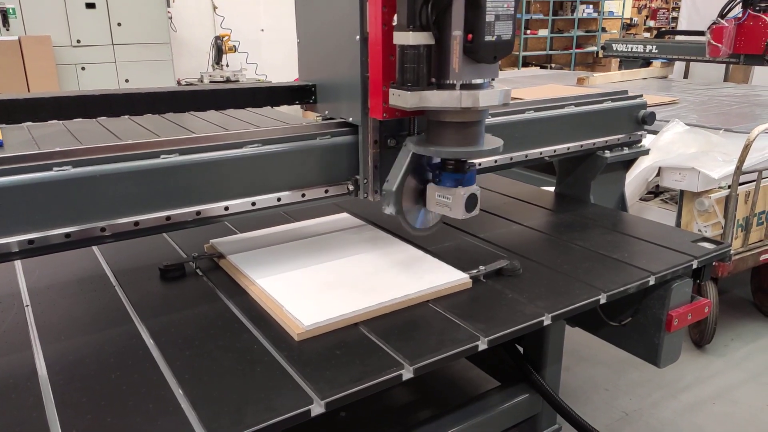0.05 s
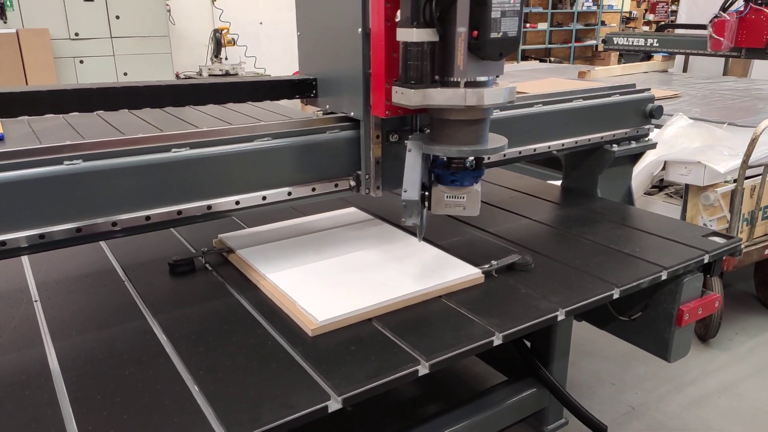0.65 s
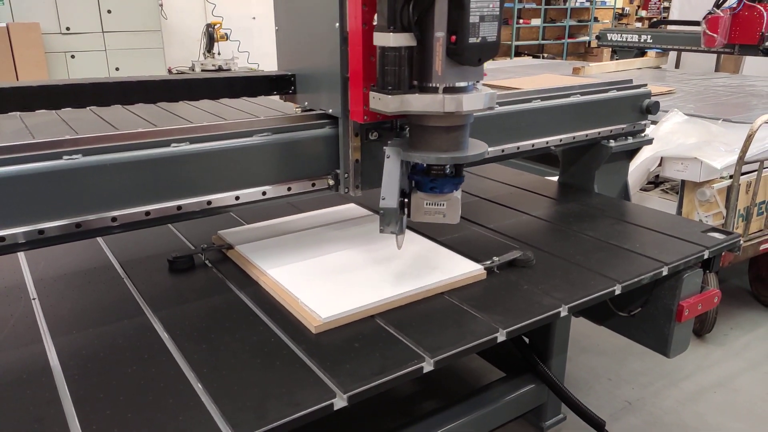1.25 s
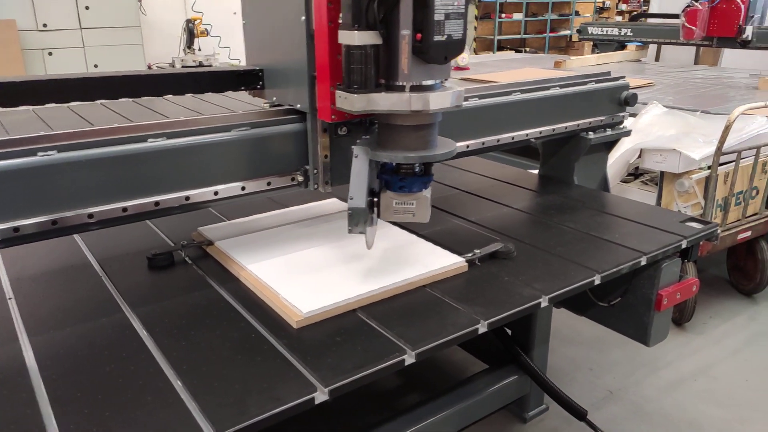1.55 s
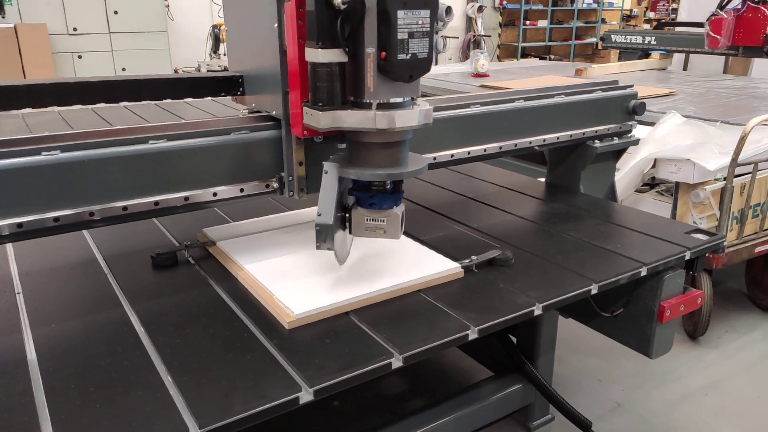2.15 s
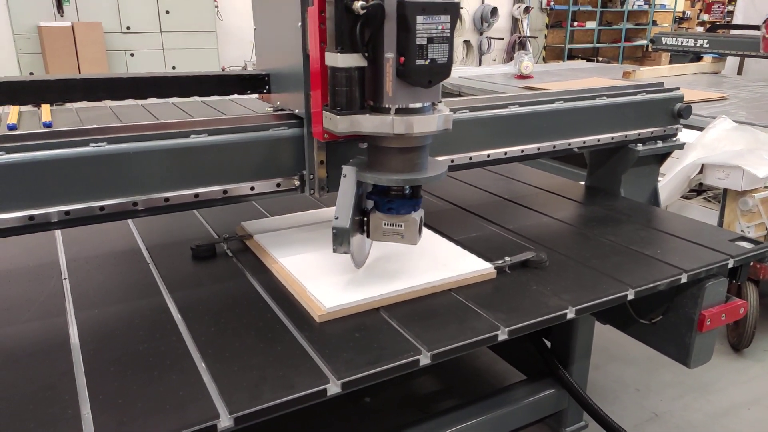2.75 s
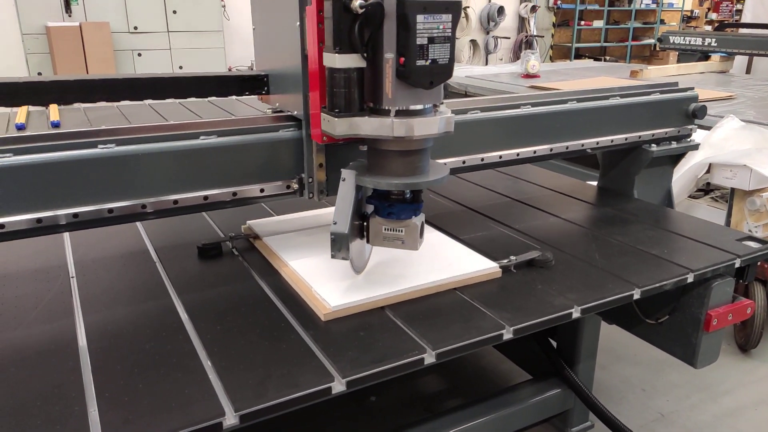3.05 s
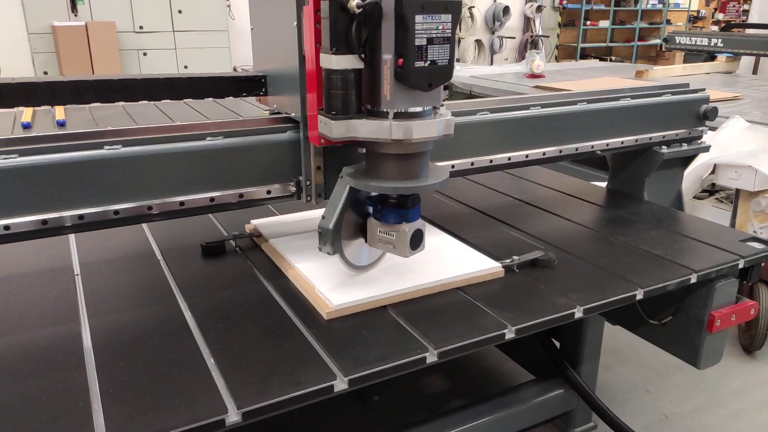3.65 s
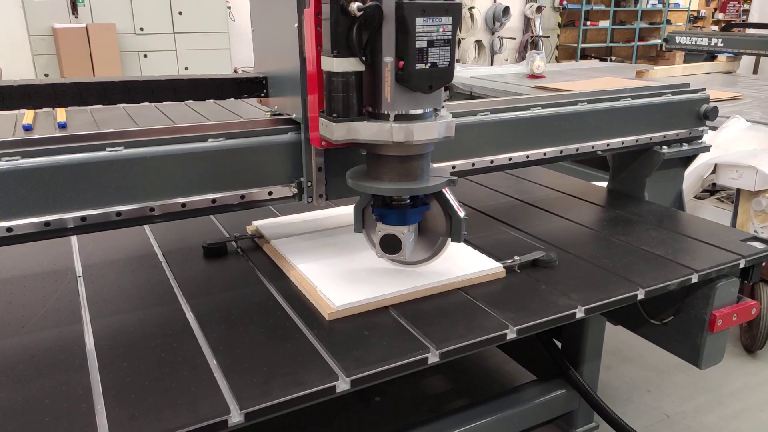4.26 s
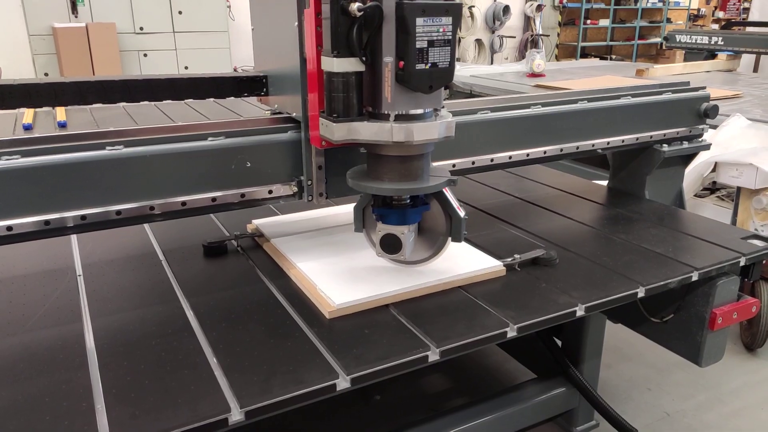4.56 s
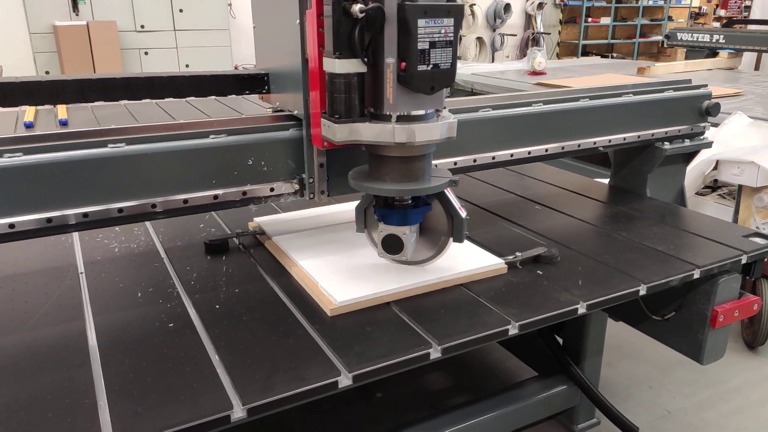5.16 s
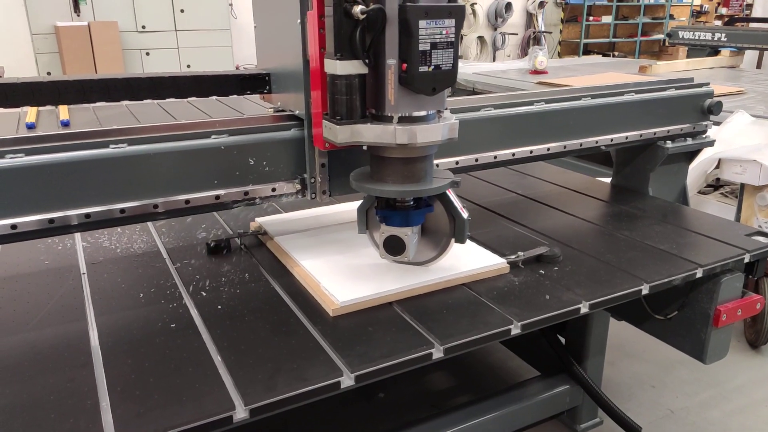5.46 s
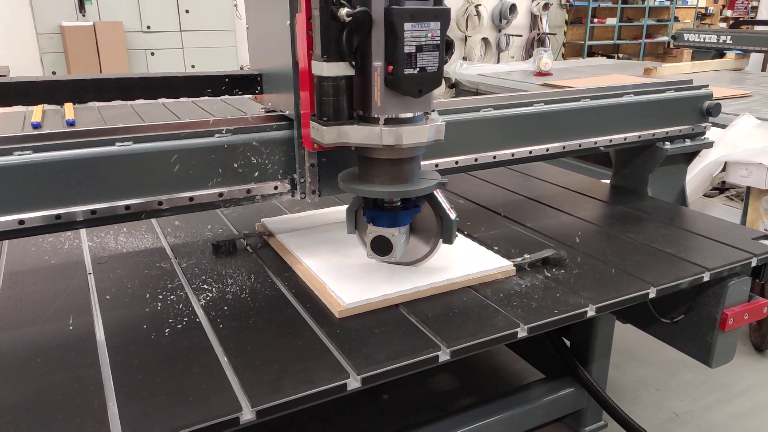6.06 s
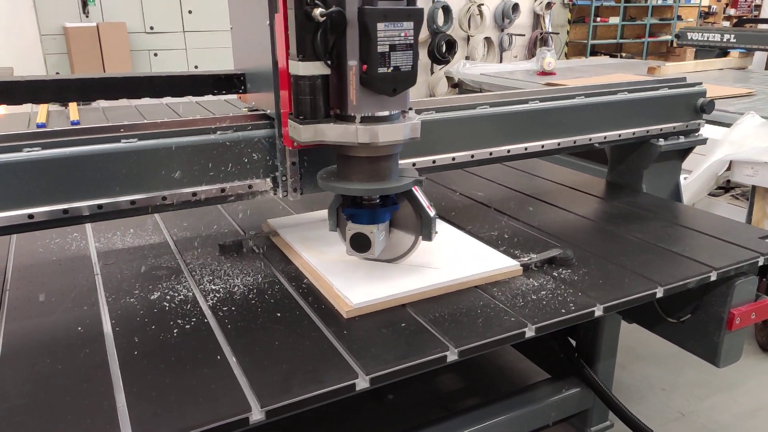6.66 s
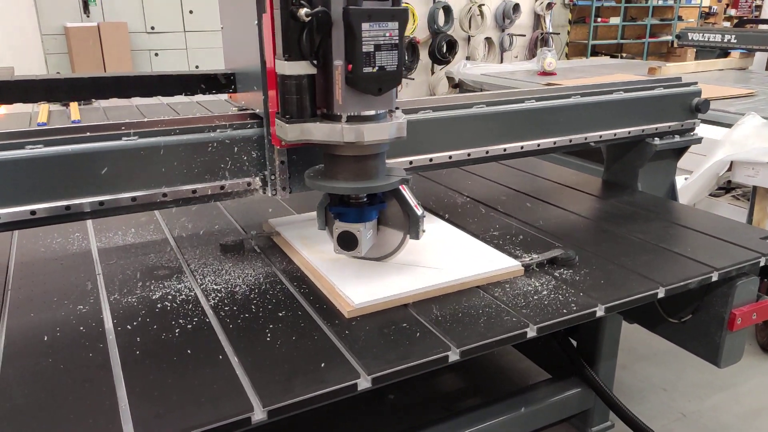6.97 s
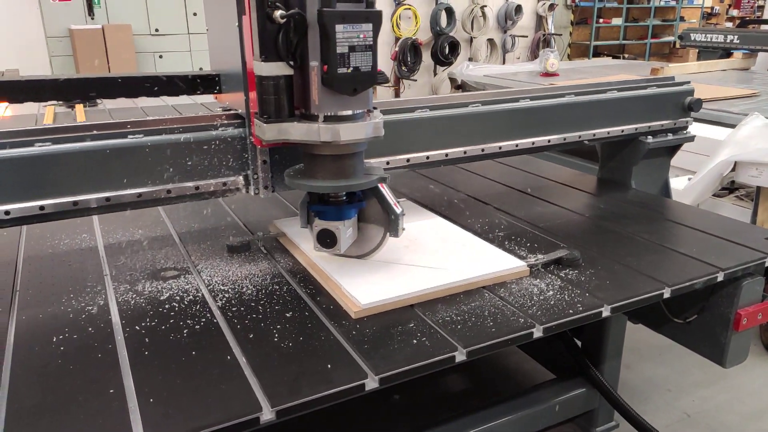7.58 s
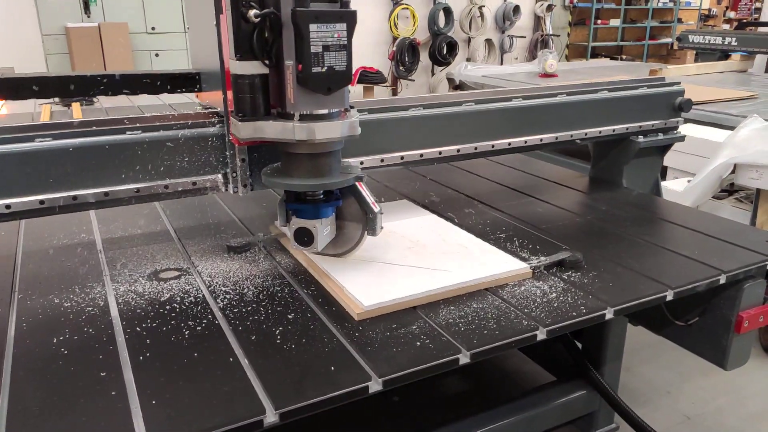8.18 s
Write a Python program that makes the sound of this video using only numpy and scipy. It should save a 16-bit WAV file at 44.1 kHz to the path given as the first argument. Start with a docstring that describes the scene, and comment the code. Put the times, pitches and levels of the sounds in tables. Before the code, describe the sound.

A brief servo whine ends in a chirp over the steady airy whir of a circular saw on a CNC router. Soft motor tones come and go above a low workshop rumble. Then the disc plunges into a plastic sheet with loud metallic ringing and screeching, centred and direct. As it feeds on, the ringing fades, leaving a wide, steady rasp with hissing chips, a gear drone sinking slightly in pitch and a high whistle.

```python
"""A servo whine brakes to a chirp over rushing air, gear whine and whistling drives: a CNC router swivels
its spinning 40-tooth saw in a workshop, rolls nearer and swivels back. The disc plunges into a clamped
plastic sheet; the teeth make it ring, chatter and squeal. In the feed the kerf damps the disc,
the spindle sags, the loaded gears buzz and the cut settles into a hissing rasp."""
import sys
import numpy as np
from scipy import signal
from scipy.fft import rfft, irfft
from scipy.io import wavfile

SR = 44100
rng = np.random.default_rng(int(sys.argv[2]) if len(sys.argv) > 2 else 0)


def unload_wav(signal):
    """Save mono or channel-first audio to the path in sys.argv[1] as 16-bit WAV at rate SR, clipped to [-1, 1]."""
    wavfile.write(
        sys.argv[1],
        SR,
        np.round(np.clip(np.atleast_2d(signal).T, -1, 1) * 32767).astype(np.int16),
    )


N = 366912
TIME = np.arange(N) / SR
FREQ = np.maximum(np.arange(N // 2 + 1) * SR / N, 1)

TEETH = 40
BRAKE_S, ARRIVE_S, TURN_S = .15, 2.85, 3.9  # head brakes edge-on, ends its approach, turns side-on
CONTACT_S, BOTTOM_S, FEED_S = 4.48, 5.95, 6.02  # disc touches, reaches full depth, starts to feed
SETTLING_S = (6.45, 6.9)  # spindle stops labouring


def undb(db):
    """Decibels to gain."""
    return 10 ** (np.asarray(db) / 20)


def fade(start_s, end_s):
    """Linear ramp from 0 to 1."""
    return np.clip((TIME - start_s) / (end_s - start_s), 0, 1)


def swell(centre_s, length_s):
    """Bell with peak 1, above one half for length_s."""
    return .5 ** ((2 * (TIME - centre_s) / length_s) ** 2)


def noise():
    """Independent white noise for mid and side."""
    return rng.standard_normal((2, N))


def walk(rate_hz):
    """Smooth random wander of spread 1, mid and side."""
    wander = irfft(rfft(noise()) / (1 + (FREQ / rate_hz) ** 4), N)
    return wander / wander.std()


def phase(hz):
    """Running angle in radians of a steady or varying frequency."""
    return 2 * np.pi * np.cumsum(hz * np.ones(N)) / SR


def shape(points):
    """Gain over frequency from (Hz, dB) points."""
    hz, db = np.transpose(points)
    return undb(np.interp(np.log(FREQ), np.log(hz), db))


def peaks(modes):
    """Response of (Hz, width in Hz, power in dB) resonances."""
    return sum(undb(db) / np.sqrt(width) / (1 + 1j * (FREQ ** 2 - hz ** 2) / (FREQ * width * 1.34)) ** 2
               for hz, width, db in modes)


def dense_modes(spacing_hz, depth_db):
    """Ragged response of a steel disc's many high modes."""
    hz = np.arange(0, SR / 2, spacing_hz)
    return undb(depth_db * np.interp(FREQ, hz, rng.standard_normal(len(hz))))


def ring(force, response, band_hz=(20, 20000)):
    """Force through a response, scaled to rms 1 inside the band."""
    spectrum = rfft(force) * response
    inside = spectrum[0, (FREQ > band_hz[0]) & (FREQ < band_hz[1])]
    return irfft(spectrum, N) * N / np.sqrt(2 * np.sum(np.abs(inside) ** 2))


def tones(lines, base_hz=1, waver_db=2, waver_hz=9, blur_rad=.16):
    """Wavering sines from (multiple of base, dB) rows; mid and side in quadrature."""
    waver, out = walk(waver_hz), 0
    for multiple, db in lines:
        level_drift, phase_drift = np.roll(waver, rng.integers(N), axis=1)
        angle = multiple * phase(base_hz) + 2 * np.pi * rng.random() + blur_rad * phase_drift
        out = out + undb(db + waver_db * level_drift) * np.array([np.sin(angle), np.cos(angle)])
    return np.sqrt(2) * out


def glides(rows, edge_s, waver_db=2, waver_hz=8):
    """Tones that swell, slide in pitch and fade."""
    waver, out = walk(waver_hz), 0
    for start_s, end_s, first_hz, last_hz, db in rows:
        level_drift, phase_drift = np.roll(waver, rng.integers(N), axis=1)
        angle = phase(np.interp(TIME, [start_s, end_s], [first_hz, last_hz])) + .31 * phase_drift
        ramp_s = min(edge_s, (end_s - start_s) / 4)
        gate = fade(start_s, start_s + ramp_s) * (1 - fade(end_s - ramp_s, end_s))
        out = out + gate * undb(db + waver_db * level_drift) * np.array([np.sin(angle), np.cos(angle)])
    return np.sqrt(2) * out


def workshop_echo(sound, t60_s, wet_db):
    """Sound plus its dying wall reflections."""
    tail = noise()[:, :SR] * undb(-60 * TIME[:SR] / t60_s)
    tail = tail / np.sqrt(np.sum(tail[0] ** 2))
    wet = undb(wet_db)
    return (sound + wet * signal.fftconvolve(sound, tail, axes=1)[:, :N]) / np.hypot(1, wet)


def stereo(sound, side_db, direct_share, swings_per_octave=2.6):
    """Reflections swing the phase between left and right; the diffuse field adds unrelated sound."""
    # Each row: frequency in Hz, relative side level in dB.
    width = [(40, -24), (110, -21.5), (200, -16), (370, -10.5), (680, -7.5), (1240, -2.5), (2270, -1),
             (4160, -.5), (7630, -.3), (14000, 0)]
    mid, diffuse = rfft(sound)
    swing = np.tanh(4 * np.sin(2 * np.pi * np.log2(FREQ / 1000) * swings_per_octave))
    side = np.sqrt(direct_share) * 1j * swing * mid + np.sqrt(1 - direct_share) * diffuse
    side = side * shape(width) * undb(side_db)
    return irfft(np.array([mid + side, mid - side]), N)


def workshop_rumble():
    """Steady low room noise."""
    # Each row: frequency in Hz, relative level in dB.
    spectrum = [(15, -32), (28, -25), (60, -21), (100, -12), (160, -12), (210, -2), (270, 0), (340, -2.5),
                (500, -40), (1000, -29), (3000, -80)]
    return ring(noise(), shape(spectrum)) * undb(-49.5)


def spindle():
    """Turns per second: the plunge slows the shaft a little, the feed drags it lower."""
    # Each row: time in seconds, shaft speed in Hz.
    speed = [(4.48, 116.3), (5.9, 115), (6.05, 113.9), (6.2, 112.8), (6.45, 111.7), (6.6, 110.3),
             (6.85, 108.4), (7.1, 108.1), (7.55, 107.05), (8.3, 106.85)]
    return np.interp(TIME, *np.transpose(speed))


def free_running(shaft_hz):
    """The disc stirs air through its guard; the gears whine and ring their housing."""
    # Air rush and tooth hiss. Each row: frequency in Hz, relative level in dB.
    rush_spectrum = [(180, -36), (300, -13), (455, -0.5), (588, -5), (669, -4.5), (824, -9.5), (943, -3),
                     (1340, -17.5), (1500, -12), (1950, -10), (3300, -120)]
    hiss_spectrum = [(700, -14), (1200, -3), (1400, -11.5), (1950, -5), (2500, -6.5), (3150, -10.5),
                     (3500, -8.5), (4000, -12), (4800, -9), (5400, -15.5), (6200, -12), (6750, -15.5),
                     (7300, -17), (8700, -28), (10300, -33), (11500, -59), (14300, -80)]
    # Air resonances. Each row: frequency in Hz, width in Hz, relative power in dB.
    guard_modes = [(462.4, 58, 1), (962, 24, -7.5), (1101, 35, -1.5), (5960, 200, -18)]
    # Each row: multiple of shaft speed, level in dB.
    gear_lines = [(7.5, -49), (15, -51.5), (30, -60.5)]
    far = 1 - fade(BRAKE_S, ARRIVE_S)
    turn_db = 2.5 * swell(TURN_S, .27)
    side_on = fade(TURN_S, 4.14)
    rush = ring(noise(), shape(rush_spectrum), (250, 700))
    hiss = ring(noise(), shape(hiss_spectrum) * dense_modes(spacing_hz=90, depth_db=1.3), (3000, 8000))
    hiss *= undb(-45 + turn_db)
    guard = ring(noise(), peaks(guard_modes))
    air = (rush * undb(-2) + guard * undb(-6.5)) * undb(-38 - 6 * far)
    housing = ring(noise(), peaks([(1754, 45, 0), (1805, 58, -2)]))
    housing *= undb(-47 + 9 * side_on + turn_db) * (1 - fade(5.0, 6.3))
    edge_whistle = ring(noise(), peaks([(6156, 110, 0)])) * undb(-53) * fade(.34, 1.2) * (1 - side_on)
    whine = tones(gear_lines, shaft_hz, waver_db=1.5) * (1 - fade(FEED_S, SETTLING_S[0]))
    return air + hiss + housing + edge_whistle + whine


def swivel():
    """The braking swivel's whine drops to a faint chirp; its casing rings on."""
    # Each row: frequency at full speed in Hz, relative level in dB.
    lines = [(888, -46.5), (1782, -41), (1887, -42.5), (3774, -40.5), (5658, -50), (7530, -58), (9430, -62)]
    speed = 1 - fade(BRAKE_S, BRAKE_S + .15) ** 1.5
    gain = speed * undb(.5 - 9 * fade(BRAKE_S, BRAKE_S + .02))
    whine = tones(lines, speed, waver_db=2.5, waver_hz=70, blur_rad=.5) * gain
    casing_db = -41.5 - 54 * np.maximum(TIME - BRAKE_S, 0)
    casing = ring(noise(), peaks([(1920, 290, 0)])) * undb(casing_db)
    return workshop_echo(whine, t60_s=.56, wet_db=-8.5) + casing


def servos():
    """The drives' switching whistles throughout; the servos sing as they move the head."""
    # Each row: frequency in Hz, level in dB.
    drive_lines = [(7833, -67), (8000, -64), (8166, -73), (10826, -77)]
    # Each row: start and end in seconds, first and last pitch in Hz, level in dB.
    moves = [ (-.2, .38, 8000, 8000, -53), (-.2, 2.65, 11752, 11752, -63.5), (-.2, 1.2, 11752, 11752, -62),
             (-.2, 2.55, 12252, 12252, -68), (2.05, 2.7, 1385, 1475, -54), (2.2, 3.75, 618, 672, -50),
             (2.8, 3.45, 531, 534, -44), (3.06, 3.28, 90, 82, -58), (3.4, 4.6, 11752, 11752, -63),
             (3.62, 5.3, 668, 688, -47), (3.755, 3.805, 4400, 4750, -46), (.205, .255, 2650, 2050, -46),
             (3.74, 3.86, 1790, 1810, -38), (6.65, 8.5, 8000, 8000, -46.5), ]
    turn_whine = ring(noise(), peaks([(8000, 35, 0)])) * undb(-46.5)
    turn_whine *= fade(3.55, 3.95) * (1 - fade(4.02, 4.08))
    return turn_whine + tones(drive_lines, waver_hz=3) + glides(moves, edge_s=.14)


def gear_buzz(shaft_hz):
    """Loaded gears, meshing alike every fourth turn, drone; their tones sink through board resonances."""
    # Each row: multiple of shaft speed, relative level in dB while labouring, and once settled.
    gear_lines = [ (5.25, -52, -48), (5.5, -50, -46), (6, -49, -55), (6.25, -49, -53), (6.5, -55, -45),
                  (7.5, -49.5, -51), (7.75, -58, -56), (8, -55, -52), (9, -46, -56), (9.25, -47, -51),
                  (9.5, -45, -53), (9.75, -47, -46), (10, -40, -47), (11, -48, -52), (11.25, -56, -49),
                  (12.5, -60, -52), (15, -42, -43), (16, -53, -51), (17, -45, -54), (18, -51, -45),
                  (18.25, -55, -50), (19, -51, -47), (20, -43, -46), (21, -56, -47), (22, -54, -50), ]
    # Each row: frequency in Hz, width in Hz, boost in dB.
    board_modes = [(667, 14, 7), (847, 32, 12), (1010, 18, 11), (1055, 24, 8), (1237, 22, 7), (2141, 12, 7),
                   (2234, 36, 10)]
    settled = fade(*SETTLING_S)
    axis_hz = FREQ[::4]
    lift_db = sum(db * .5 ** ((2 * (axis_hz - hz) / width) ** 2) for hz, width, db in board_modes)
    lines = []
    for multiple, labour_db, settled_db in gear_lines:
        load_db = labour_db + (settled_db - labour_db) * settled
        lines.append((multiple, load_db + np.interp(multiple * shaft_hz, axis_hz, lift_db)))
    drone = tones(lines, shaft_hz, waver_db=2.2, waver_hz=5, blur_rad=.22)
    return drone * fade(FEED_S, FEED_S + .1) * undb(1)


def bites(shaft_hz, tooth_depth=.83, turn_depth=.072, grain_db=.5):
    """Crackling cutting force: each tooth tears a chip, and the disc bites harder once a turn."""
    turn = phase(shaft_hz)
    pressure = (1 + tooth_depth * np.cos(TEETH * turn)) * (1 + turn_depth * np.cos(turn))
    return noise() * pressure * undb(grain_db * walk(1600)[0])


def cut_db(touch_db, deep_db, fall_db_per_s):
    """Relative level that climbs as the disc sinks in and falls as the kerf lengthens."""
    climb_db = (deep_db - touch_db) * fade(CONTACT_S, BOTTOM_S)
    return touch_db + climb_db - fall_db_per_s * np.maximum(TIME - BOTTOM_S, 0)


def chips(shaft_hz):
    """Swarf hisses off the teeth in uneven spurts, thinning while the head rests at full depth."""
    # Each row: frequency in Hz, relative level in dB.
    spectrum = [(1500, -33), (2400, -6), (2630, -9), (2850, 5.5), (2990, 4.5), (3110, -13), (3230, 2),
                (3340, -1), (3510, -16), (3680, 7.5), (4050, -3), (4180, -1), (4310, -0.5), (4500, -0.5),
                (4750, -5.5), (5120, 1.5), (5350, -1), (5550, -1.5), (6100, 3), (6600, 2.5), (7450, 4.5),
                (7880, -3.5), (8200, 1), (8700, -1), (9500, -15), (10100, -3), (11000, -12), (11800, -7),
                (13000, -10.5), (14000, -6.5)]
    # Each row: centre and length in seconds, boost in dB.
    spurts = [(6.163, 0.077, 3.5), (7.413, 0.09, 2.5)]
    response = shape(spectrum) * dense_modes(spacing_hz=40, depth_db=3.3)
    hiss = ring(bites(shaft_hz, turn_depth=.1, grain_db=1.8), response, (5000, 9000))
    spurts_db = sum(db * swell(s, length_s) for s, length_s, db in spurts) + .91 * walk(32)[0]
    rest_db = -5 * swell(FEED_S, .15)
    return hiss * undb(cut_db(-34.5, -27.5, fall_db_per_s=.91) + spurts_db + rest_db - 4.5)


def sheet(shaft_hz):
    """The teeth make the sheet roar; in the feed the kerf and the clamped board resonate."""
    # Each row: frequency in Hz, relative level in dB.
    spectrum = [(88, -56), (150, -25), (199, -15.5), (302, -15.5), (357, -9), (576, -0.5), (765, -7.5),
                (838, -1.5), (917, -47), (1040, 2.5), (1140, -7), (1800, -3.5), (2180, 1), (2580, -8.5),
                (3300, -39), (4290, -47), (7260, -120)]
    # Each row: frequency in Hz, width in Hz, relative power in dB.
    kerf_modes = [(2237, 45, 0), (2510, 60, -6), (2840, 110, -4), (3750, 210, -5), (3920, 35, 2),
                  (4270, 30, -2.5), (4970, 64, 2.5), (5930, 36, 0.5), (6330, 25, 6.5), (6490, 46, 8.5),
                  (7250, 29, 2.5), (7820, 45, -3), (8790, 40, -6), (8840, 35, -11)]
    labour_db = 2 * swell(FEED_S, .6)
    gain = undb(cut_db(-33.5, -30, fall_db_per_s=1.2) + labour_db)
    feeding = fade(BOTTOM_S, FEED_S + .32)
    roar = ring(bites(shaft_hz, turn_depth=.12), shape(spectrum), (750, 1400))
    roar *= undb(-6) * (.46 + .36 * fade(5.02, 5.06))
    kerf = ring(bites(shaft_hz), peaks(kerf_modes)) * undb(-.5) * feeding
    board = ring(bites(shaft_hz), peaks([(1052, 63, 0)])) * feeding * (1 - fade(6.8, 7.5))
    return (roar + kerf) * gain + board * undb(-40.5)


def disc_ring(shaft_hz, low_width_hz=11, high_width_hz=24):
    """The barely held disc rings and shakes the sheet until the kerf damps it."""
    # Disc modes. Each row: frequency in Hz, relative power in dB.
    low_modes = [(2209, 2), (2326, -4), (2482, -7), (2541, -10), (2794, -6), (2966, -9)]
    high_modes = [(3935, 6), (4624, 0), (4910, -2.5), (5938, -3.5), (6180, -6), (6300, -0.5), (6476, -5.5),
                  (6820, -6), (7154, 1.5), (7630, -1), (8775, -3.5)]
    # Sheet resonances. Each row: frequency in Hz, width in Hz, relative power in dB.
    chatter_modes = [(1107, 38, -10), (1660, 71, -4.5), (1780, 58, 1), (1833, 110, -2.5), (2190, 91, -0.5),
                     (2467, 100, -6), (3743, 240, -3), (5180, 580, -5.5), (6940, 1100, -6.5)]
    # Dips between the ringing ranges. Each row: frequency in Hz, gain in dB.
    gaps = [(2560, 0), (2660, -4), (2780, 0), (3000, 0), (3120, -10), (3240, -3), (3400, -9), (3600, 0),
            (4050, 0), (4150, -5), (4300, 0), (4420, -5), (4600, 0)]
    # The sheet grabs the disc. Each row: centre and length in seconds, low, chatter, high boost in dB.
    grabs = [ (5.33, 0.21, 4.5, 3, 0.5), (5.628, 0.14, 3, 8.5, 6.5), (5.796, 0.073, 0, 3.5, 5),
             (5.872, 0.097, -1, 9.5, 3), (5.958, 0.027, -12, 6.5, -4), ]
    low_db, chatter_db, high_db = sum(np.outer(dbs, swell(s, length_s)) for s, length_s, *dbs in grabs)
    force = bites(shaft_hz, grain_db=1.5)
    low = ring(force, peaks([(hz, low_width_hz, db) for hz, db in low_modes]) * shape(gaps))
    low *= undb(cut_db(-43.5, -23.5, fall_db_per_s=19) + low_db + 1)
    high = ring(force, peaks([(hz, high_width_hz, db) for hz, db in high_modes]))
    high *= undb(cut_db(-43, -30, fall_db_per_s=49) + high_db + 3.5)
    rough_force = bites(shaft_hz, grain_db=3)
    ragged = dense_modes(spacing_hz=34.98, depth_db=2.5)
    chatter = ring(rough_force, peaks(chatter_modes) * shape(gaps) * ragged)
    chatter *= undb(cut_db(-38, -26, fall_db_per_s=4.8) + chatter_db + .45)
    chatter *= .49 + .68 * fade(5.13, 5.22)
    return (low + high + chatter) * (1 - fade(6.15, 6.77))


def squeals(shaft_hz):
    """Disc and sheet squeal as one mode after another locks to the teeth."""
    # Each row: start and end in seconds, first and last pitch in Hz, relative level in dB.
    locks = [ (5.08, 5.92, 2539, 2541, -35), (5.1, 5.72, 1488, 1488, -39), (5.15, 5.26, 2481, 2481, -28),
             (5.08, 5.55, 645, 648, -37), (5.4, 5.97, 647, 652, -28.5), (5.33, 6.02, 531, 537, -32.5),
             (5.27, 5.4, 2205, 2208, -23.5), (5.27, 5.36, 2792, 2792, -30.5),
             (5.295, 5.345, 1772, 1772, -22), (5.4, 5.485, 2208, 2211, -17.5),
             (5.41, 5.46, 2792, 2792, -28), (5.5, 5.72, 2482, 2482, -26), (5.52, 5.64, 3935, 3935, -25),
             (5.59, 5.86, 1766, 1778, -24), (5.6, 5.765, 2792, 2794, -19), (5.62, 5.75, 2966, 2966, -30),
             (5.72, 5.84, 2482, 2484, -19.5), (5.72, 6.04, 1066, 1105, -30.5),
             (5.735, 5.8, 3935, 3935, -22), (5.75, 6.06, 2793, 2796, -26), (5.855, 5.93, 3930, 3938, -18.5),
             (5.875, 5.925, 1775, 1778, -16), (5.93, 5.985, 2205, 2212, -14),
             (5.99, 6.045, 3938, 3938, -24), (6.06, 6.115, 3940, 3940, -25), (6.41, 6.465, 3945, 3945, -31),
             ]
    screech = glides(locks, edge_s=.17, waver_db=1.8, waver_hz=55)
    once_a_turn = 1 + .35 * np.cos(phase(shaft_hz))
    return workshop_echo(screech * once_a_turn, t60_s=.5, wet_db=-11) * undb(-1.5)


def scene():
    """Machine and cut diffuse, slightly right; the ringing disc central and more direct."""
    shaft_hz = spindle()
    touching = fade(CONTACT_S - .02, CONTACT_S + .084)
    background = workshop_rumble() + free_running(shaft_hz) + swivel() + servos()
    cut = touching * (chips(shaft_hz) + sheet(shaft_hz) + gear_buzz(shaft_hz))
    machine = stereo(background + cut, side_db=-.5, direct_share=.011) * undb([[-.35], [.35]])
    plunge = touching * (disc_ring(shaft_hz) + squeals(shaft_hz))
    return machine + stereo(plunge, side_db=-1, direct_share=.85)


def record(dry, ceiling=.9, top_hz=14350):
    """Soft limit on the highest peaks, then a steep low-pass."""
    rounded = dry / (1 + (dry / ceiling) ** 6) ** (1 / 6)
    return signal.sosfilt(signal.ellip(12, .2, 80, top_hz, fs=SR, output="sos"), rounded)


dry = scene()
out = record(dry)
unload_wav(out)
```